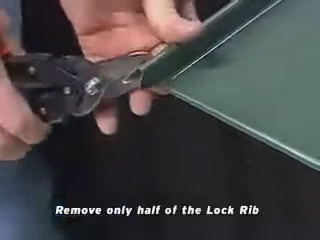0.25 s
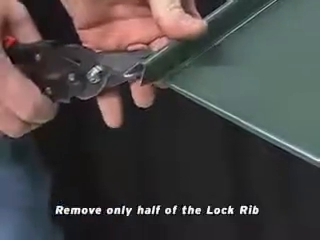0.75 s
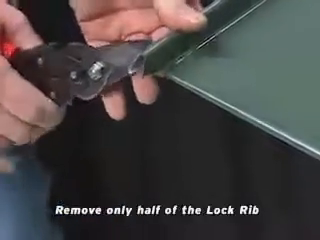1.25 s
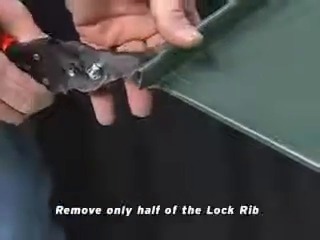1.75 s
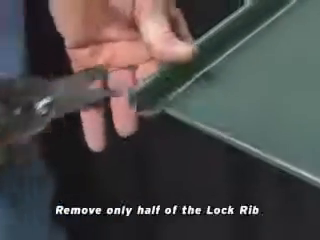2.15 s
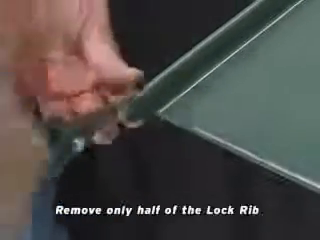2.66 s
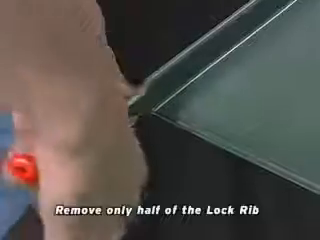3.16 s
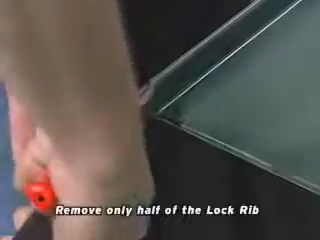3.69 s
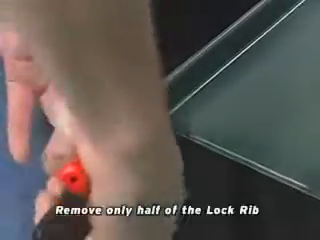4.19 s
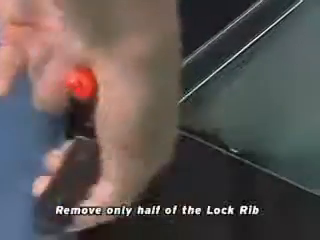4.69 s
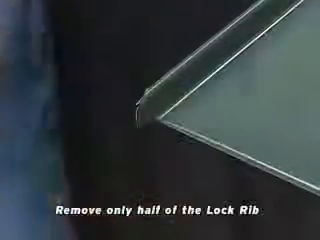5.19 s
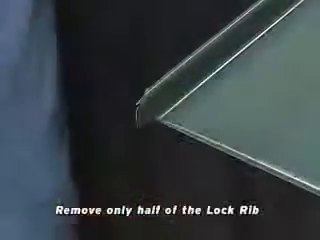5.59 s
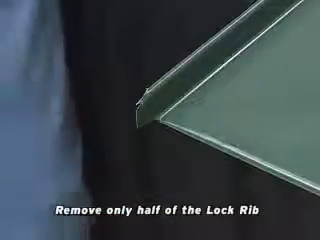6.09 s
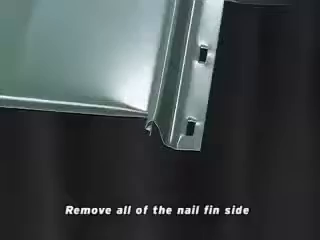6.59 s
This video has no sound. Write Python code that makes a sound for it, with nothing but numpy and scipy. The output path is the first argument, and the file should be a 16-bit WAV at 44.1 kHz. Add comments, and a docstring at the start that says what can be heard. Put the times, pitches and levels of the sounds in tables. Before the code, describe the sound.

A hand tool works on a thin sheet-metal edge, heard closely over faint room air. Soft bumps lead to a crashing snip that sets the whole panel ringing for about a second. Scratchy slips, little cracks and jaw clicks fill the gaps. A knock and a punchy second snip follow, more damped behind its bright bite. A short high squeak, near silence, then a loose metal scrap bounces and clanks on the floor.

```python
"""Hand tin snips bite through the rib of a steel roofing panel, close to the microphone.
Each bite cracks and kicks the sheet, which shivers in a dense crash of random-phase modes.
Between bites the blades scrape in uneven slips, the jaws click and knock, and the pivot squeaks once.
At the end the loose offcut lands with a few dull clanks, made of damped sines and a longer ring.
Room air, faint steady tones and the slow wobble of the held sheet lie underneath."""
import sys
import numpy as np
from scipy import signal
from scipy.fft import rfft, irfft
from scipy.io import wavfile

SR = 44100
rng = np.random.default_rng(int(sys.argv[2]) if len(sys.argv) > 2 else 0)


def inscribe(sig):
    """Save sig as 16-bit PCM at rate SR to the path in sys.argv[1].

    A 1-D sig is mono; a 2-D sig holds one channel per row.
    Samples are clipped to [-1, 1] before scaling.
    """
    pcm = np.round(np.clip(np.atleast_2d(sig).T, -1, 1) * 32767)
    wavfile.write(sys.argv[1], SR, pcm.astype(np.int16))


N = 302016

# Room air, relative spectrum: pitch_hz, density [dB per Hz]
AIR_SPECTRUM = [(12, -46), (20, -7), (49, -5), (128, -10.5), (158, -14), (267, -20.5), (439, -25),
                (585, -25.5), (780, -28.5), (866, -27), (1500, -35.5), (2110, -35.5), (2340, -39),
                (4270, -39), (10400, -39), (13500, -89), (22000, -120)]
# Faint steady tones: pitch_hz, level_db
STEADY_TONES = [(1082, -68.5), (1588, -76.5), (2159, -72.5)]
# The sheet's lowest modes, which carry the wobble: pitch_hz, width_hz, relative level_db
WOBBLE_MODES = [(67.6, 3.6, 7), (108.3, 5.5, 0.5), (144.8, 11, -7.5)]
# The hands bend the sheet and it wobbles on: start_s, level_db
HAND_BENDS = [(0.0, -45), (1.07, -41), (2.3, -42), (3.17, -42.5), (4.04, -37.5)]
AIR_DB = -47
WOBBLE_RISE_S, WOBBLE_FADE_DB_PER_S = 0.04, 11
EDGE_HZ = 10550  # upper limit of the sound

# The sheet's dense shiver, relative spectrum: pitch_hz, density [dB per Hz]
SHEET_SPECTRUM = [(29, -36), (50, -11), (228, -4.5), (326, -3.5), (357, -4), (522, -5), (610, -6),
                  (834, -6), (1330, -7.5), (1490, -5), (2850, -8.5), (5820, -17), (8510, -18.5),
                  (10400, -26), (13500, -75), (22000, -120)]
# The free sheet's ring, shortened by a factor for each kind of contact: pitch_hz, t60_s
SHEET_RING = [(80, 2.45), (210, 1.41), (560, 1.43), (1470, 1.166), (3000, 0.86), (5000, 0.83),
              (10000, 0.55)]
# Clear modes, each a cluster of close neighbours: pitch_hz, width_hz, relative level_db,
# t60_s (before the same ring factor)
PANEL_MODES = [(274, 18, -19, 1.45), (428, 21.5, 1, 0.67), (535, 13, -7, 0.7), (636, 9.2, -3.5, 1.1),
               (798.6, 21, -0.5, 1.04), (866.4, 13.6, 1.5, 1.35), (1063, 11, -6.5, 1.15),
               (1218, 23, -14.5, 0.82), (1840, 14, -7, 1.15), (2064, 38, -12, 0.92), (2350, 13, 0, 0.24),
               (2704, 5.2, -4, 0.73), (3090, 5.5, -9.5, 0.9), (3310, 24, -8.5, 0.78), (4580, 38, -10, 0.28),
               (5400, 40, -20, .55), (8160, 30, -14.5, 0.58)]
# Broad resonances with the jaws clamping across the rib: pitch_hz, width_hz, height_db
GRIP_ACROSS_PEAKS = [(260, 16, -3), (396, 74, 4), (547, 35, 6), (634, 89, -1), (840, 110, 2.5),
                     (1200, 26, 8), (1470, 133, 2.5), (1846, 180, -7), (2200, 41, 1.5), (2740, 200, 1.5),
                     (3320, 240, 3.5), (3870, 39, -6), (4610, 46, 6.5), (5225, 130, 5), (6140, 240, -2.5),
                     (7100, 140, 2), (8980, 130, 9)]
# Broad resonances with the jaws clamping from above: pitch_hz, width_hz, height_db
GRIP_ABOVE_PEAKS = [(154, 21, 5.5), (450, 71, 6), (694, 49, 8.5), (920, 103, 11), (1030, 55, 1),
                    (1260, 130, 0.5), (1420, 160, 3.5), (1866, 25, 12), (2360, 340, 8.5), (2700, 82, -2),
                    (2860, 100, 8), (6500, 1200, -2), (8700, 1300, 4), (9660, 130, 11)]
REGRIP_S = 3.5  # the jaws clamp across the rib before this time, from above after it
CLEAR_MODES_DB = -16.5  # the panel's clear modes re its shiver, after a snap or bump

# The snips bump the panel; a softer contact has less treble and more bass:
# start_s, shiver level_db, softness_db
PANEL_BUMPS = [(0.0, -32, 2.5), (0.357, -34, 12), (0.378, -36, 14), (1.665, -31, 7), (2.103, -28, -2),
               (2.218, -48, 13), (3.173, -35, 22), (3.952, -30.5, 5), (4.041, -35, -12), (4.0592, -21, 3.5),
               (4.375, -29.5, 12)]
BUMP_BUILD_S, BUMP_CRACK_DB, BUMP_CRACK_HZ = 0.001, -9, 3000  # crack level re the shiver
BUMP_BASS_DB, BASS_PER_SOFTNESS = 6, 0.31  # bass at zero softness; its rise in dB per dB
RING_ACROSS, RING_ABOVE = 0.51, 0.3  # ring factors after a bump: the grip from above damps more

# The blades drag along the edge: start_s, end_s, level_db, treble_db
BLADE_SCRAPES = [(1.035, 1.07, -46, -14), (1.465, 1.495, -31, -1), (1.83, 1.863, -30, -1),
                 (2.075, 2.142, -36, -6), (2.178, 2.231, -33.5, -3), (3.628, 3.666, -49.5, -9),
                 (3.99, 4.044, -29.5, -4), (4.06, 4.104, -30, -3.5)]

# The blades break right through and the sheet jumps: start_s, shiver level_db, build_up_s, bass_db,
# treble_db, clear modes re shiver [dB], crack level_db, kick level_db, push_s
FULL_CUTS = [(1.065, -10, 0.018, -0.5, 2, -16, -8.5, -9, 0.002),
             (4.5343, -16, 0.022, -11.5, 7, -7.5, -31, 6, 0.00046)]
CUT_RING, CUT_CRACK_HZ = 0.98, 7440  # ring factor; upper pitch of the crack
KICK_LAG_S = 0.00087  # the sheet jumps just after the steel cracks

# The steel gives a little further: start_s, shiver level_db, brightness_db, crack pitch_hz, crack t60_s
# (this t60 is shared by both of the crack's pitches; the table pitch is the upper one)
STEEL_SNAPS = [(1.489, -22, 0.5, 5400, 0.024), (1.4952, -29, 8.5, 2830, 0.013),
               (1.8439, -26.5, -4, 6940, 0.018), (1.8634, -27, 13.5, 7060, 0.0046),
               (4.563, -16.5, -9, 8500, 0.006)]
# The rib clacks as the steel gives: pitch_hz, level re the crack [dB], t60_s
RIB_CLACK_MODES = [(1100, -5, 0.012), (2650, -4, 0.012)]
SNAP_BUILD_S, SNAP_BASS_DB, SNAP_RING = 0.0029, 6, 0.59
SNAP_CRACK_DB, CRACK_PER_BRIGHTNESS = 4, 1.32  # crack re the shiver; its rise in dB per dB
SNAP_RING_DB, SNAP_GRIT_DB = 2, -1.5  # the blades' upper ring and the grit within a snap's crack

# The jaws click open or against the rib: start_s, ring level_db, treble_db,
# tick level_db (a further factor of two lifts the tick)
CLICKS = [(2.54, -50, -14, -44.5), (2.8262, -38.5, -8.5, -33), (2.9176, -23.5, 4.5, -20.5),
          (3.171, -60, -12, -40.5), (3.234, -48.5, -3, -50), (3.652, -54, -24, -51),
          (3.951, -35.5, -13, -33)]
# The snips knock on the rib: start_s, level_db, pitch_hz, t60_s
RIB_KNOCKS = [(2.56, -46, 1190, 0.47), (4.356, -23, 1020, 0.11)]
# The jaws' ring, relative spectrum: pitch_hz, density [dB per Hz]
JAW_SPECTRUM = [(100, -2), (450, -0.5), (800, -3), (1350, -9.5), (1800, -7.5), (2200, -3.5), (2600, -2),
                (3200, -10.5), (3900, -14.5), (5000, -12), (5750, -11), (6600, -10), (8500, -17.5),
                (10000, -24)]
# How long the jaws ring: pitch_hz, t60_s
JAW_RING = [(200, 1), (2300, 0.76), (6000, 0.33), (10000, 0.35)]
# The jaws' sharp resonances: pitch_hz, width_hz, height_db
JAW_RESONANCES = [(1890, 14, 11), (2010, 33, 5.8), (3000, 40, 6.4), (5610, 120, 11), (6750, 78, 5.3),
                  (7250, 74, 8), (9300, 60, 5), (9980, 190, 17)]

# The offcut lands and bounces: start_s, clank level_db, treble_db, ring level_db (before its early swell)
LANDINGS = [(5.794, -23.5, -13, -41.5), (5.873, -39.5, 2, -47.5), (5.9423, -10.5, 5.5, -28),
            (5.9472, -7, -12.5, -28.5)]
# The offcut's damped modes: pitch_hz, relative level_db, t60_s
OFFCUT_MODES = [(560, -20, 0.059), (730, -10, 0.069), (900, 4, 0.041), (1100, -10, 0.017),
                (1480, 0.5, 0.0084), (2090, -13, 0.032), (2660, -4.5, 0.011), (3000, -5.5, 0.0066),
                (3780, -18, 0.016), (5870, -14, 0.021), (6300, -22, 0.022)]
# Floor and room after a landing, relative spectrum: pitch_hz, density [dB per Hz]
AFTER_SPECTRUM = [(100, -18), (280, -10.5), (450, -5.5), (720, -5), (880, -1), (1150, -10), (1700, -19.5),
                  (2800, -29.5), (4700, -38.5), (5950, -35), (7000, -39), (10000, -47)]
# How long floor and room sound: pitch_hz, t60_s
AFTER_RING = [(200, 0.51), (900, 0.71), (2000, 0.71), (6000, 0.8)]
# The offcut's lasting ring: pitch_hz, width_hz, height_db
AFTER_RESONANCES = [(1010, 30, -4), (2720, 88, 8), (5820, 130, 12), (6562, 125, 5), (8700, 270, 3)]

T = np.arange(round(1.5 * SR)) / SR  # time within one event, s
HZ = np.fft.rfftfreq(len(T), 1 / SR)


def amp(db):
    """Decibels to amplitude."""
    return 10 ** (np.asarray(db) / 20)


def unit(x):
    """Scale to an RMS of one."""
    return x / np.sqrt(np.mean(x ** 2) + 1e-20)


def read(points, hz):
    """A table joined by straight lines on a log-frequency axis."""
    f, value = np.transpose(points)
    return np.interp(np.log(hz + 1), np.log(f + 1), value)


def add(mix, s, sound):
    """Lay a sound into the mix at time s, cut off at the end."""
    part = mix[max(round(s * SR), 0):][:len(sound)]
    part += sound[:len(part)]


def treble(hz, corner_hz=3800):
    """A shelf that goes from 0 to 1 around the corner."""
    return hz ** 4 / (hz ** 4 + corner_hz ** 4)


def bass(hz, corner_hz=520):
    """A shelf that goes from 1 to 0 around the corner."""
    return corner_hz ** 4 / (hz ** 4 + corner_hz ** 4)


def peaks_db(peaks, hz):
    """Bell-shaped resonances, in dB."""
    return sum(db / (1 + (2 * (hz - f) / width) ** 2) for f, width, db in peaks)


def uneven(ripple_db=3.0, treble_ripple_db=-0.3, spacing_hz=50):
    """Each touch lands somewhere else on the steel and favours other modes, in dB."""
    knots = rng.standard_normal(4096)
    depth_db = ripple_db + treble_ripple_db * treble(HZ)
    depth_db = depth_db * (1 - bass(HZ, corner_hz=1100))
    return depth_db * np.interp(HZ, spacing_hz * np.arange(len(knots)), knots)


def crowd(colour_db):
    """Countless modes of random phase under one spectrum."""
    phases = np.exp(2j * np.pi * rng.random(len(HZ)))
    return unit(irfft(amp(colour_db) * (HZ < EDGE_HZ) * phases))


def fade(t60):
    """An even decay by 60 dB in t60 seconds."""
    return np.exp(-np.log(1000) * T / t60)


def die_away(x, t60s, factor=1):
    """Each frequency fades at its own speed."""
    hz, t, z = signal.stft(x, SR, nperseg=512)
    t60 = np.maximum(factor * read(t60s, hz), .01)[:, None]
    return signal.istft(z * amp(-60 * t / t60), SR, nperseg=512)[1][:len(x)]


def mode(hz, t60, phase=0):
    """One dying sine."""
    return fade(t60) * np.sin(2 * np.pi * hz * T + phase)


def wobble_level(t):
    """Each bend sets the sheet swinging; the swings add in power and fade slowly."""
    power = np.zeros(len(t))
    for s, db in HAND_BENDS:
        age = np.maximum(t - s, 0)
        rise = 1 - np.exp(-age / WOBBLE_RISE_S)
        power += (rise * amp(db - WOBBLE_FADE_DB_PER_S * age)) ** 2
    return np.sqrt(power)


def background():
    """Filtered noise for room air, steady sines, and noise through the sheet's low modes for its wobble."""
    t, hz = np.arange(N) / SR, np.fft.rfftfreq(N, 1 / SR)
    air_shape = amp(read(AIR_SPECTRUM, hz)) * (hz < EDGE_HZ)
    air = unit(irfft(rfft(rng.standard_normal(N)) * air_shape, N))
    tones = sum(amp(db) * np.sqrt(2) * np.sin(2 * np.pi * (f * t + rng.random()))
                for f, db in STEADY_TONES)
    low_modes = sum(amp(db) / (1 + (2 * (hz - f) / width) ** 2) for f, width, db in WOBBLE_MODES)
    wobble = unit(irfft(rfft(rng.standard_normal(N)) * low_modes, N))
    return amp(AIR_DB) * air + tones + wobble_level(t) * wobble


def sheet_colour(s):
    """The panel's spectrum as it is gripped at time s, in dB."""
    grip = GRIP_ACROSS_PEAKS if s < REGRIP_S else GRIP_ABOVE_PEAKS
    return read(SHEET_SPECTRUM, HZ) + peaks_db(grip, HZ) + uneven()


def clear_modes(ring):
    """Close neighbours beat, so each ring wavers as it dies."""
    total = np.zeros(len(T))
    for hz, width, db, t60 in PANEL_MODES:
        cluster = crowd(-20 * np.log10(1 + (2 * (HZ - hz) / width) ** 4))
        total += amp(db) * cluster * fade(t60 * ring)
    return total


def rattle(depth=0.19, grain_hz=600, settle_s=0.12):
    """Steel chatters against steel: a quick uneven flutter of level that soon settles."""
    knots = rng.standard_normal(4096)
    flutter = np.interp(T * grain_hz, np.arange(len(knots)), knots)
    return 1 + depth * flutter * np.exp(-T / settle_s)


def shiver(s, build, bass_db, treble_db, ring, modes_db):
    """Bending waves spread over the sheet and build up, then die away at each frequency's own speed."""
    colour = sheet_colour(s) + bass_db * bass(HZ) + treble_db * treble(HZ)
    dense = rattle() * die_away(crowd(colour), SHEET_RING, ring)
    return (1 - np.exp(-T / build)) * (dense + amp(modes_db) * clear_modes(ring))


def crack(high_hz, low_hz=1700, t60=0.0078, high_db=-2, grit_db=-1, grit_s=0.00097):
    """A hard contact or parting of steel: a very short ring at two pitches and a pinch of grit."""
    grit = amp(grit_db) * crowd(-4 * treble(HZ)) * np.exp(-T / grit_s)
    # both pitches of the crack die away with the same t60
    return grit - mode(low_hz, t60) - amp(high_db) * mode(high_hz, t60)


def blows():
    """Each blow is a crack and a shiver: bumps thud, full cuts crash, brighter snaps crack louder."""
    out = np.zeros(N)
    for s, db, soft_db in PANEL_BUMPS:
        ring = RING_ACROSS if s < REGRIP_S else RING_ABOVE
        bass_db = BUMP_BASS_DB + BASS_PER_SOFTNESS * soft_db
        sheet = shiver(s, BUMP_BUILD_S, bass_db, -soft_db, ring, CLEAR_MODES_DB)
        add(out, s, amp(db) * (sheet + amp(BUMP_CRACK_DB) * crack(BUMP_CRACK_HZ)))
    for s, db, build, bass_db, treble_db, modes_db, crack_db, _, _ in FULL_CUTS:
        sheet = shiver(s, build, bass_db, treble_db, CUT_RING, modes_db)
        add(out, s, amp(db) * sheet + amp(crack_db) * crack(CUT_CRACK_HZ))
    for s, db, bright_db, crack_hz, crack_t60 in STEEL_SNAPS:
        sheet = shiver(s, SNAP_BUILD_S, SNAP_BASS_DB, bright_db, SNAP_RING, CLEAR_MODES_DB)
        steel = crack(crack_hz, t60=crack_t60, high_db=SNAP_RING_DB, grit_db=SNAP_GRIT_DB)
        steel = steel + sum(amp(level) * mode(hz, t60) for hz, level, t60 in RIB_CLACK_MODES)
        crack_db = SNAP_CRACK_DB + CRACK_PER_BRIGHTNESS * bright_db
        add(out, s, amp(db) * (sheet + amp(crack_db) * steel))
    return out


def scrapes(slips_per_s=1300, dry_db=-8, dry_treble_db=4, ring=0.55, press_s=0.016):
    """Rapid uneven slips of the blade shake the sheet, harder as the hand bears down."""
    out = np.zeros(N)
    for start, end, db, treble_db in BLADE_SCRAPES:
        stroke = T < end - start
        sizes = rng.exponential(1, len(T)) * rng.choice([-1, 1], len(T))
        sizes = sizes * np.minimum(T / press_s, 1)
        slips = stroke * sizes * (rng.random(len(T)) < slips_per_s / SR)
        colour = sheet_colour(start) + treble_db * treble(HZ)
        direct = irfft(rfft(slips) * amp(colour + dry_treble_db * treble(HZ))) * stroke
        sheet_ring = die_away(crowd(colour), SHEET_RING, ring)
        shaken = signal.fftconvolve(slips, sheet_ring)[:len(T)]
        sound = unit(shaken) + amp(dry_db) * unit(direct)
        add(out, start, amp(db) * sound / np.std(sound[stroke]))  # level holds within the stroke
    return out


def kicks(swing_hz=78, swing_t60=0.0097, swing_db=-6):
    """The sheet's jump pushes one puff of air and swings back."""
    out = np.zeros(N)
    for s, *_, db, push in FULL_CUTS:
        u = T / push
        puff = -2 * (1 - u) * np.exp(-u) * (1 - np.exp(-4 * u))
        swing = (1 - np.exp(-u)) * mode(swing_hz, swing_t60)
        add(out, s + KICK_LAG_S, amp(db) * (puff + amp(swing_db) * swing))
    return out


def jaws(tick_hz=2600, tick_width_hz=650, tick_t60=0.043, rise=0.0017):
    """Clicks are a short band of modes with a bright ring behind; knocks are one band dying evenly."""
    out = np.zeros(N)
    onset = 1 - np.exp(-T / rise)
    for s, db, treble_db, tick_db in CLICKS:
        colour = read(JAW_SPECTRUM, HZ) + peaks_db(JAW_RESONANCES, HZ) + uneven()
        ring = die_away(crowd(colour + treble_db * treble(HZ)), JAW_RING)
        tick_band = -20 * np.log10(1 + ((HZ - tick_hz) / tick_width_hz) ** 4)
        tick = crowd(tick_band) * fade(tick_t60)
        add(out, s, onset * (amp(db) * ring + 2 * amp(tick_db) * tick))
    for s, db, hz, t60 in RIB_KNOCKS:
        body = crowd(-10 * np.log10(1 + ((HZ - hz) / 130) ** 2) - 6 * treble(HZ))
        add(out, s, amp(db) * onset * body * fade(t60))
    return out


def squeak(s=4.918, length=0.024, db=-30, hz=6450, width_hz=700, upper_hz=9800, upper_db=-13,
           rasp_db=-24, tail=0.26):
    """The pivot gives a short, high, raspy chirp: two noise bands over a faint floor, fluttering."""
    out = np.zeros(N)
    main_band = 1 / (1 + ((HZ - hz) / width_hz) ** 4)
    upper_band = amp(upper_db) / (1 + ((HZ - upper_hz) / width_hz) ** 4)
    stroke = np.sin(np.pi * np.minimum(T / length, 1) ** 2.1)  # swells late, then stops
    colour = 20 * np.log10(main_band + upper_band + amp(rasp_db))
    rasp = crowd(colour) * rattle(depth=0.35, grain_hz=746)
    add(out, s, amp(db) * rasp * (stroke + tail * np.exp(-T / 0.033)))
    return out


def offcut():
    """A small piece of steel lands: damped modes, then the floor and room ring on."""
    out = np.zeros(N)
    for s, db, treble_db, ring_db in LANDINGS:
        clank = sum(amp(level + treble_db * treble(hz, corner_hz=1900)) * mode(hz, t60)
                    for hz, level, t60 in OFFCUT_MODES)
        colour = read(AFTER_SPECTRUM, HZ) + peaks_db(AFTER_RESONANCES, HZ) + uneven()
        early_swell = (1 - np.exp(-T / 0.00065)) * (1 + 2.0 * np.exp(-T / 0.01))
        after = die_away(crowd(colour), AFTER_RING) * early_swell
        add(out, s, amp(ring_db) * after - amp(db) * clank * (1 - np.exp(-T / 0.00038)))
    return out


def scene():
    """All the sounds together at one microphone."""
    return (background() + blows() + scrapes() + kicks() + jaws() + squeak() + offcut())[None]


def record(dry):
    """The loudest peaks are rounded off; then a steep band limit."""
    rounded = dry / (1 + (dry / .85) ** 6) ** (1 / 6)
    band_limit = signal.firwin(511, EDGE_HZ, window=("kaiser", 8), fs=SR)[None]
    return signal.oaconvolve(rounded, band_limit, "same")


dry = scene()
out = record(dry)
inscribe(out)
```